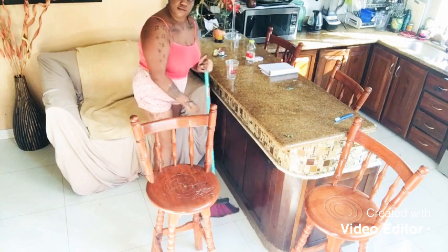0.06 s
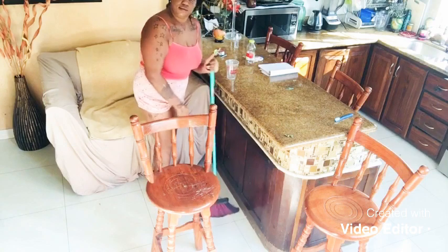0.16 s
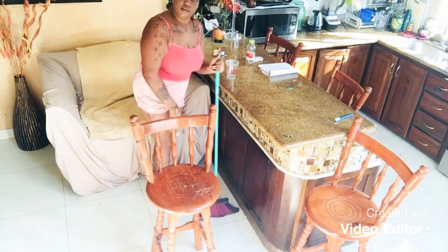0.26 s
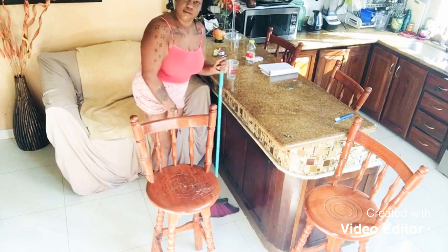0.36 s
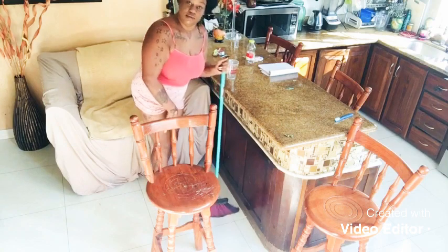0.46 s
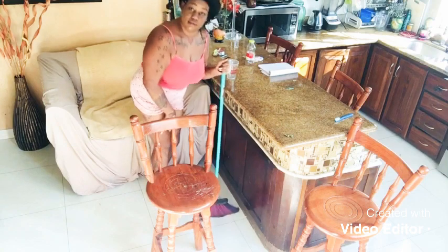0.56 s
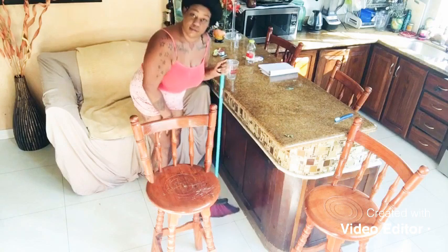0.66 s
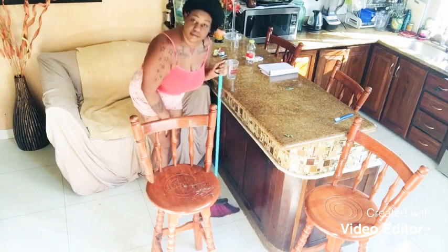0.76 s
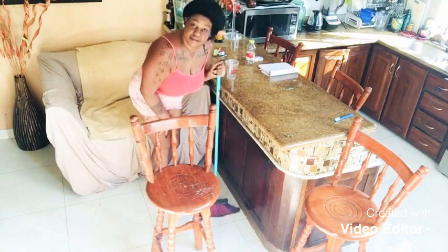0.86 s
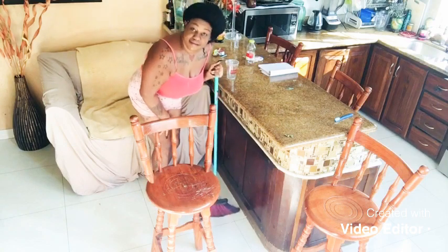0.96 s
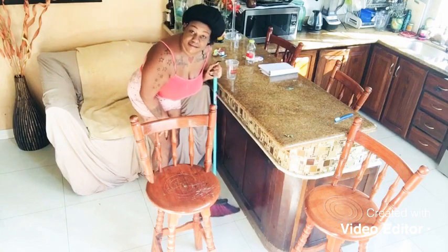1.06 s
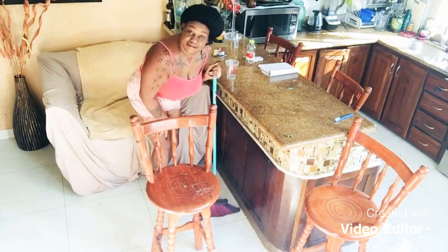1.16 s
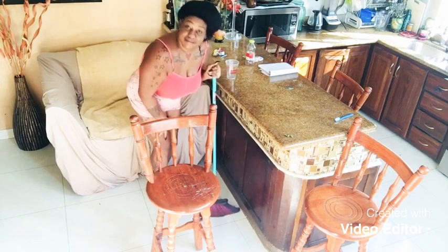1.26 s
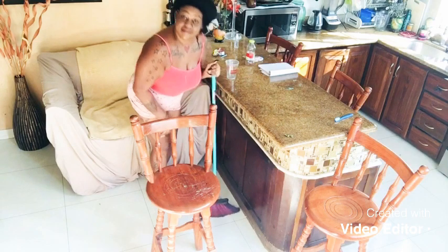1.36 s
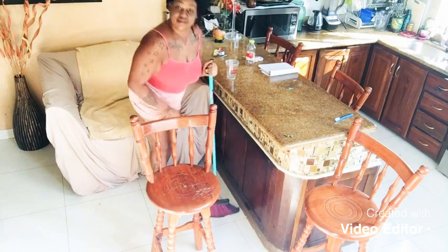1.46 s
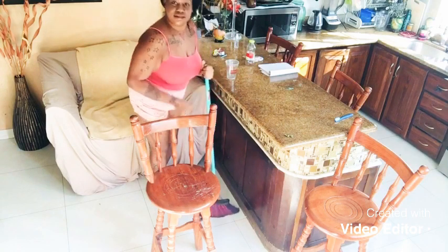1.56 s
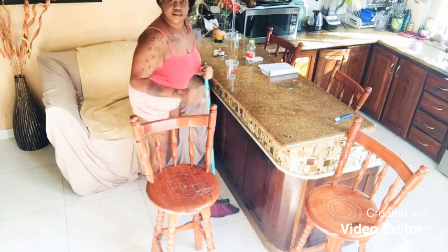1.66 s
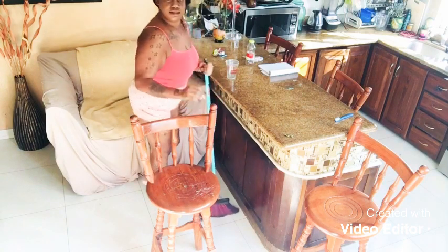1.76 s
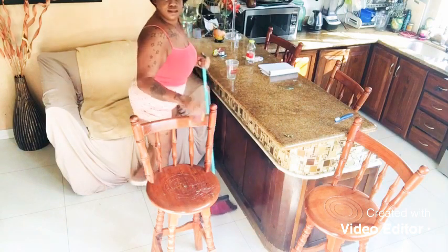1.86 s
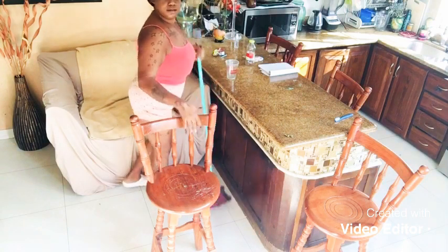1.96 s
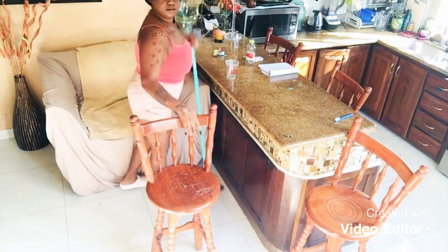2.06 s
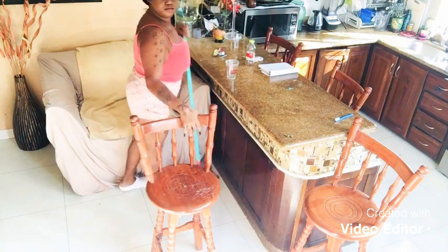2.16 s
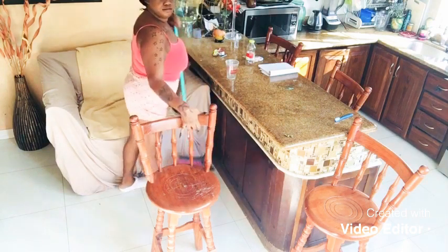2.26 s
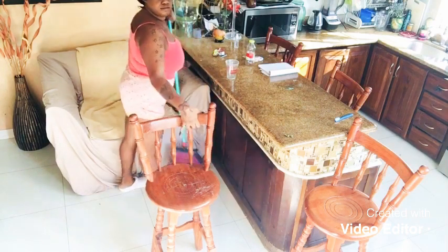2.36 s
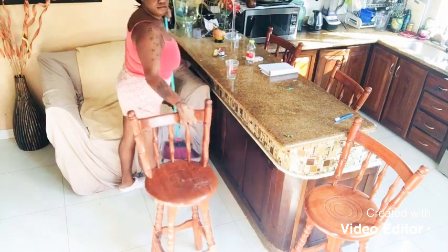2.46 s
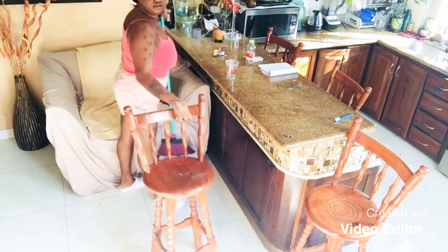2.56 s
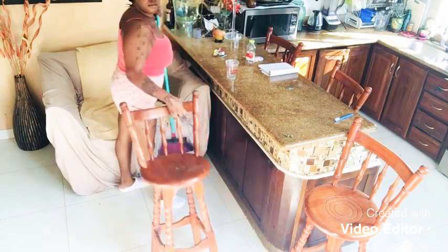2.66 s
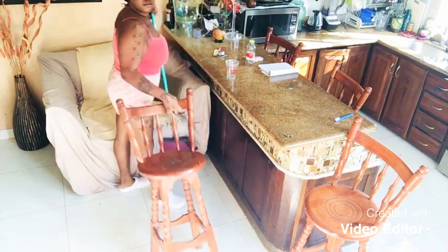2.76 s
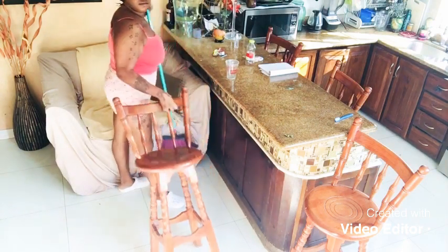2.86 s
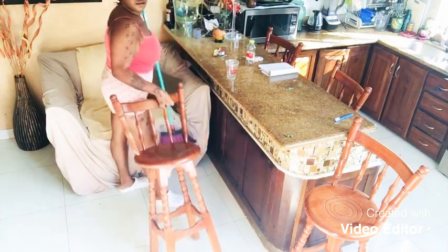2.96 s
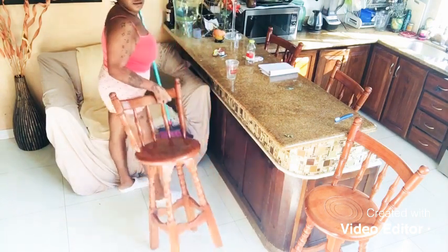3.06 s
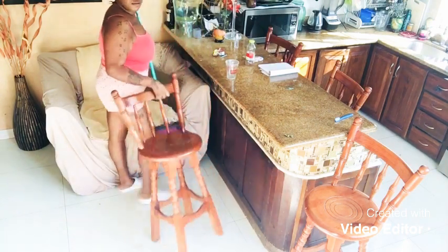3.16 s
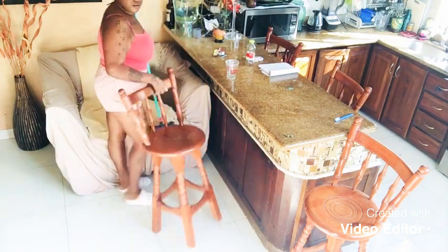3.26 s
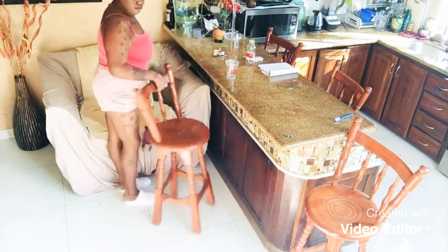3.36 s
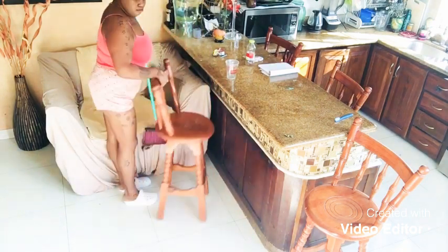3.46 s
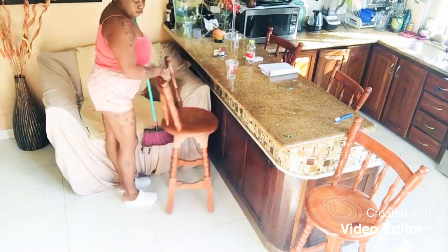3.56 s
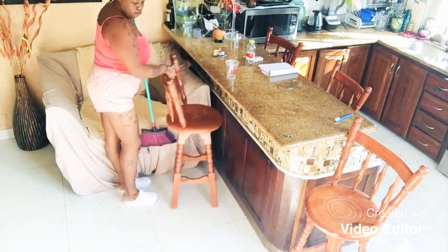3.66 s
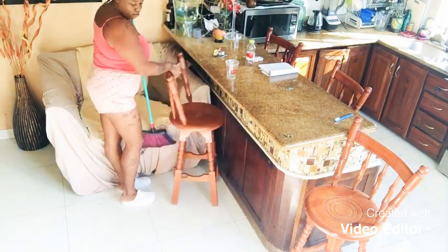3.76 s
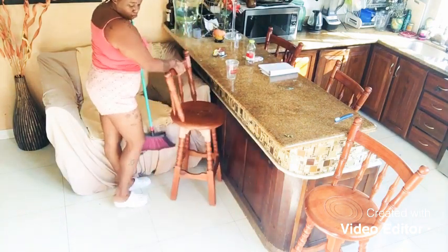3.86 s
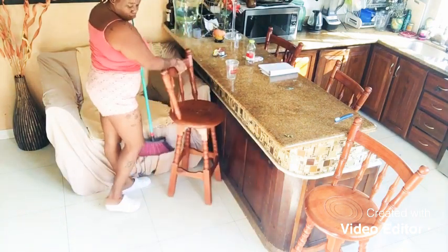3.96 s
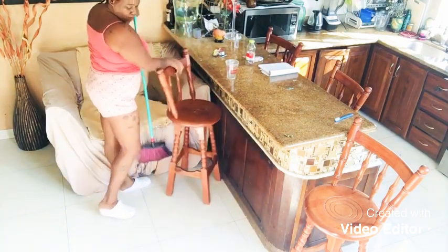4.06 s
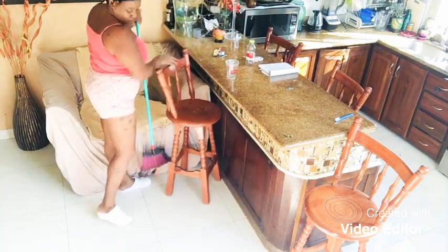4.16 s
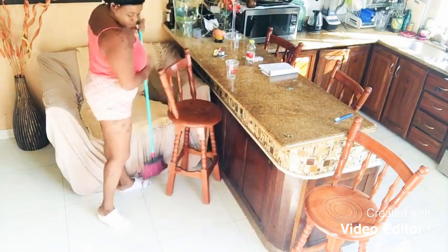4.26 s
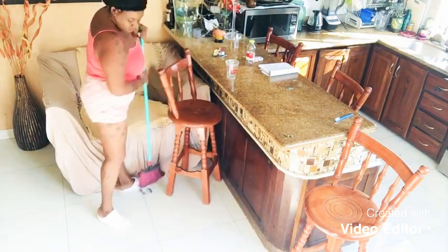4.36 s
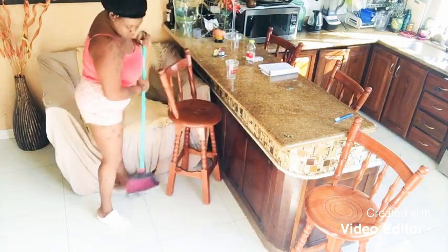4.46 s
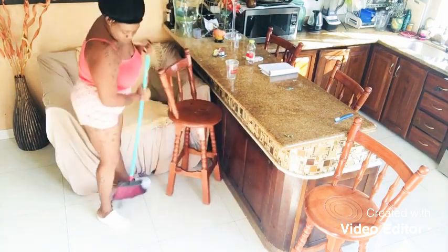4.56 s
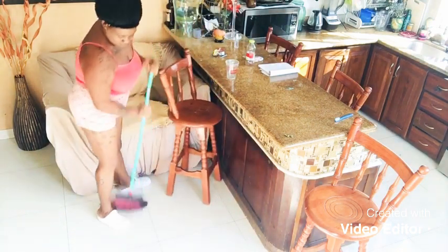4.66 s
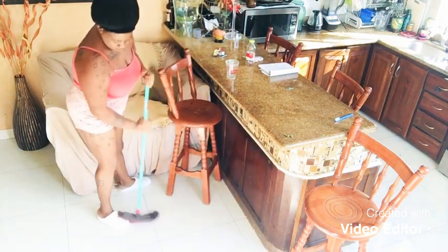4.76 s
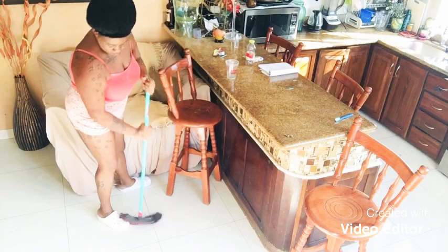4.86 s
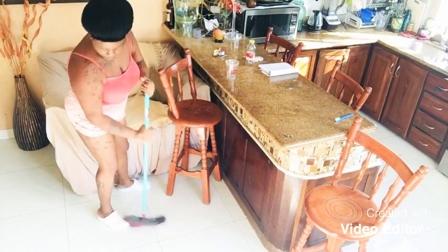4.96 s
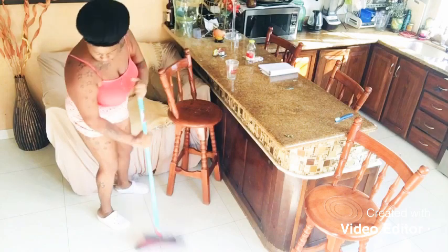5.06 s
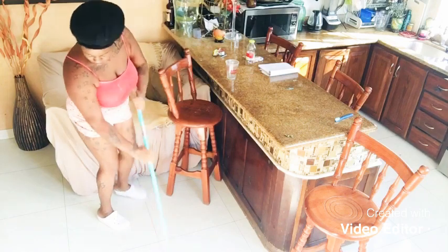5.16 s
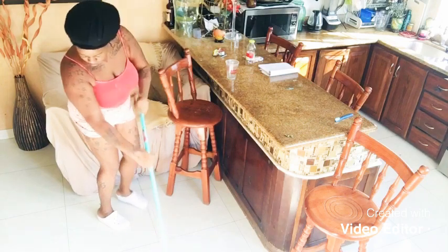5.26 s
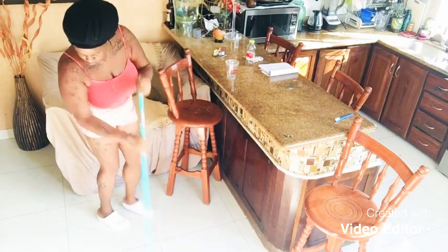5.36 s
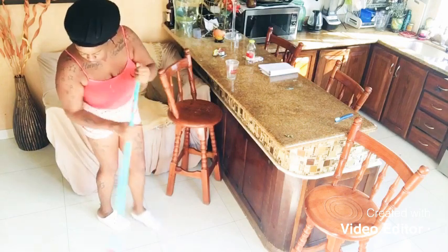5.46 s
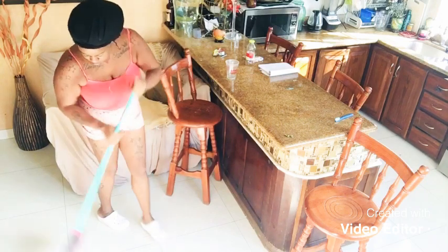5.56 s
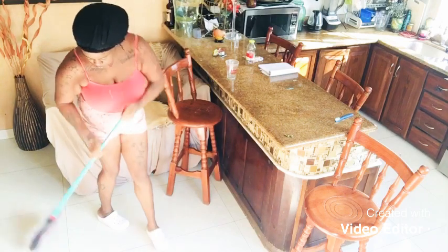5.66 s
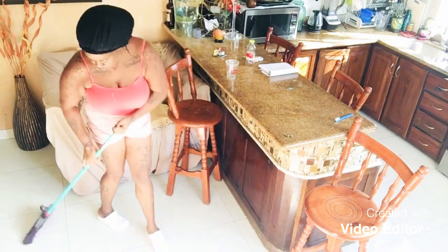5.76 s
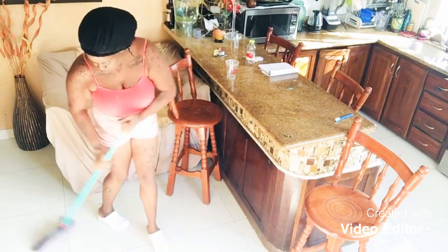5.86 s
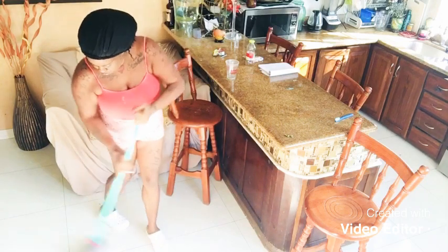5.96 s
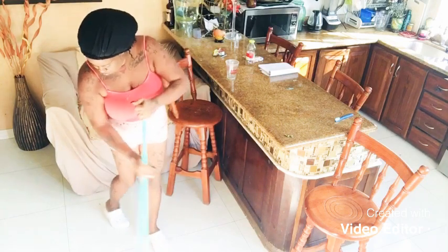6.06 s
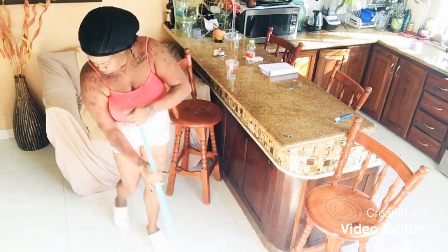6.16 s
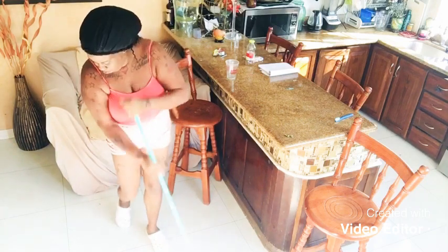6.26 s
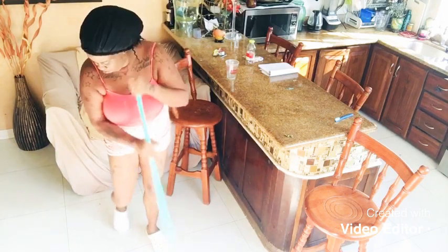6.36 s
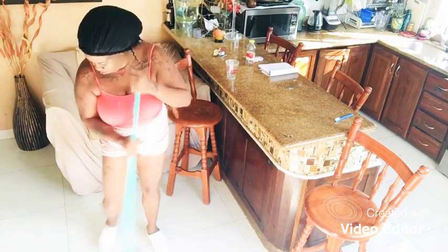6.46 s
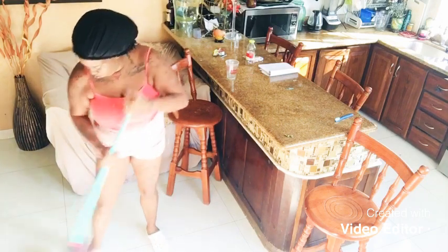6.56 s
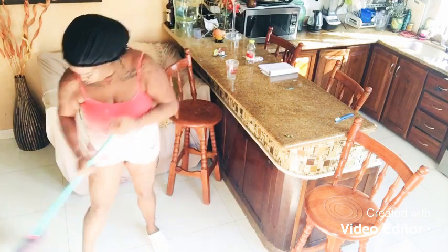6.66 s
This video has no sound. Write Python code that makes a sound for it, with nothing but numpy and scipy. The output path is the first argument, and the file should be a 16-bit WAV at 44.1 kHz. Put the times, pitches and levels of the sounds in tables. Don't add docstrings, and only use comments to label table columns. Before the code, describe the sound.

Close, hard clacks and a juddering wooden drag on glazed tile burst out of a quiet kitchen, surrounded by light bristle brushing and small taps.

```python
import sys
import numpy as np
from scipy import signal
from scipy.fft import rfft, irfft, next_fast_len
from scipy.io import wavfile
from scipy.ndimage import uniform_filter1d, map_coordinates

SR = 44100
rng = np.random.default_rng(int(sys.argv[2]) if len(sys.argv) > 2 else 0)


def ratio(d):
    e = np.asarray(d, float) / 20
    return 10 ** e


def transcribe(u):
    v = np.clip(np.atleast_2d(u).T, -1, 1)
    q = np.round(v * 32767).astype(np.int16)
    wavfile.write(sys.argv[1], SR, q)


N = 295911

# centre_hz, width_hz, level_db
STOOL_FRAME = [(72.3, 16, -3), (173, 22.9, -2), (243, 20.8, -5.5), (292, 12, -6.5), (354.8, 33, -4.5),
               (468, 40, -12), (635, 35, -9.5), (942, 60, -2), (1120, 55, 4.5), (1313, 50, -4.5),
               (1480, 59.9, -4.5), (1620, 82, 1.5), (2050, 130, -3), (2555, 120, -5), (3000, 150, -10.5),
               (3580, 100, -7.5), (4300, 200, -14.5)]
# frequency_hz, level_db (per Hz)
STRUCK_WOOD = [(180, -44.5), (300, -7), (348, -4.5), (535, 1), (1120, -9), (1370, -10), (2040, -11),
               (3630, -12.5), (4960, -28.5), (6900, -34), (15500, -53.5)]


def leg_blows():
    # start_s, peak_db, thud_db, click_db, leg_pitch_hz
    blows = [(2.976, -27, -20.5, -16.5, 1500), (2.981, -17.5, -16.5, -16, 1400),
             (2.994, -20.5, -13.5, -27.5, 1260), (3.234, -39.5, -6, -22, 600),
             (3.255, -39.5, -11, -14.5, 1065), (3.368, -0.5, -22, -34, 1450), (3.372, -3, -22, -30, 1569),
             (3.3775, 1.5, -19, -28, 1400), (3.96, -19, -5, -34, 1900), (3.965, -18, -4, -46.5, 1490),
             (3.977, -14, -8.5, -38, 980), (4.205, -26, 1, -19, 1120), (4.263, -16, -12, -26, 2000)]
    rows = [(*row, contact_s(.0055, row[1])) for row in blows]
    return knocks(rows, ring_db=-0.5, width=.42, wet_db=-1.5, gain_db=-9.5, swell=0.062, broad=0.57, low_hz=470)


def leg_slips():
    # start_s, peak_db, thud_db, click_db, leg_pitch_hz
    slips = [(3.412, -14, -19, -30.5, 1570), (3.511, -14.5, -18, -28, 1170), (3.539, -4.5, -10, -30, 2050),
             (3.556, -13, -11, -30, 1220), (3.574, -14, -19, -28, 690), (3.625, -13.5, -3, -29.5, 2090),
             (3.679, -10, -22, -26, 1130), (3.706, -8, -26, -23.5, 2030), (3.721, -7.5, -10.5, -29.5, 1620),
             (3.756, -16, -38, -27.5, 1640), (3.78, -6, -28, -25, 2050), (3.81, -17, -12.5, -28.5, 2900),
             (4.005, -21.5, -12, -23, 1650), (4.035, -27, 1.5, -33, 1100), (4.222, -20.5, -7, -22.5, 1150),
             (4.25, -19.5, -15, -28, 1000)]
    rows = [(*row, contact_s(.0055, row[1])) for row in slips]
    return knocks(rows, ring_db=3.0, width=.18, wet_db=-3.5, gain_db=-8, swell=1.8, broad=0.34, low_hz=452)


def drag():
    # start_s, length_s, scrape_db, shudder_db, deep_db
    shoves = [(2.84, .11, -66, -85, -72), (2.99, .08, -56, -60, -41), (3.1, .08, -59, -72, -47),
              (3.235, .05, -60, -72, -44), (3.385, .06, -29, -40, -40), (3.47, .04, -34, -36, -41),
              (3.52, .16, -27.5, -38, -42), (3.74, .08, -38, -38, -34.5), (3.88, .03, -55, -50, -41),
              (3.97, .05, -50, -49, -34.5), (4.14, .05, -58, -47, -47), (4.22, .07, -41, -37, -44)]
    start, length, *db = np.transpose(shoves)
    rise_db_s = np.array([[750], [500], [500]])
    fall_db_s = np.array([[260], [160], [260]])
    levels = np.transpose(db)[..., None]
    scrape_db, shudder_db, deep_db = gestures(start, length, levels, rise_db_s, fall_db_s)

    def wood(f):
        return causal((np.abs(modes(STOOL_FRAME, f)) + .25) * ratio(along(STRUCK_WOOD, f)) * (f > 300))

    slips = grains(3000, spread_db=1) * ratio(5.04 * wobble(55))
    scrape = ratio(scrape_db) * patchy(filtered(slips, wood), patchy_db=4)
    echo = signal.fftconvolve(scrape, tails(count=1)[0])[:N]

    shudder = unit(filtered(grains(360, spread_db=2.0), lambda f: modes(STOOL_FRAME[1:6], f) ** 2))
    sway = ratio(1.8 * wobble(15)) * tone(STOOL_FRAME[1][0], wander=.04, rate=11)
    shudder = 0.85 * shudder + 0.95 * sway

    deep = ratio(2.5 * wobble(14)) * tone(STOOL_FRAME[0][0], wander=0.049, rate=9)
    floor = unit(filtered(slips, lambda f: modes([(75, 90, 0)], f) ** 2))
    deep = deep + .6 * floor
    return scrape + 0.45 * echo + ratio(shudder_db) * shudder + ratio(deep_db) * deep


def ringing_rungs():
    # start_s, pitch_hz, level_db, t60_s
    rungs = [(3.0, 292, -49, 1.1), (3.24, 600, -50, .6), (3.62, 356, -37, .6), (3.79, 356, -33, .45),
             (4.02, 250, -43, .8), (4.24, 173, -30, .45)]
    out, t = np.zeros(N + SR), np.arange(SR // 2) / SR
    flutter_db, drift = 1.6 * wobble(25), 1 + .012 * wobble(20)
    for s, hz, db, t60 in rungs:
        now = slice(round(s * SR), round(s * SR) + len(t))
        decay_db = db + 3 - 60 * t / t60 + flutter_db[now]
        swell = (1 - np.exp(-t / .015)) * ratio(decay_db) * np.cos(np.pi * t)
        out[now] += swell * np.sin(2 * np.pi * hz * np.cumsum(drift[now]) / SR)
    return out[:N]


def small_taps():
    # start_s, peak_db, click_db, pitch_hz
    taps = [(.426, -51.5, -19, 1560), (1.287, -56.5, -16, 4000), (1.5, -69.5, 3, 3000),
            (1.951, -34, -22.5, 1870), (1.952, -36, -23, 1350), (2.16, -47, -18, 1960),
            (2.207, -45.5, -20, 2400), (2.28, -40.5, -17.5, 2050), (2.281, -50.5, -10, 4000),
            (2.725, -50.5, -16, 1980), (4.14, -61, 1, 3000), (4.618, -53, -7, 2970), (5.35, -77, -9, 4400),
            (5.566, -58.5, -5, 3276), (5.599, -44.5, -13.5, 1780), (5.6, -46.5, -10, 2320),
            (5.638, -43.5, -22, 1307), (5.64, -52, -24, 2250), (6.573, -73, -18, 4400)]
    # start_s, peak_db, pitch_hz
    nudges = [(.775, -59, 3170), (1.99, -51.5, 1940), (2.335, -44.5, 1800), (2.85, -50, 1770),
              (2.927, -54, 1340), (6.632, -45.5, 1250)]
    thud_db = -30
    rows = [(s, db, thud_db, click_db, hz, contact_s(.004, db + 35)) for s, db, click_db, hz in taps]
    rows += [(s, db, thud_db, -26, hz, .021) for s, db, hz in nudges]
    return knocks(sorted(rows), ring_db=-14, width=0.17, wet_db=-2.5, gain_db=-11, swell=.12, broad=.04,
                  low_hz=1068)


def squeak():
    # time_s, pitch_hz, level_db
    glide = [(2.27, 2105, -90), (2.29, 2040, -58), (2.34, 1960, -61), (2.4, 1920, -65), (2.44, 1920, -63),
             (2.48, 1880, -89.5)]
    hz, db = curves(glide)
    return ratio(db + 5 * wobble(60)) * tone(hz, wander=.03, rate=200)


def broom():
    # start_s, length_s, pressure_db, brightness_db
    strokes = [(.52, .02, -78, 1.1), (1.29, .17, -75, -3), (1.505, .11, -69, 1.5), (2.12, .08, -75, -4),
               (2.225, .01, -63, -1.5), (2.29, .2, -68.5, -7), (2.73, .1, -72, -5), (2.84, .32, -65, -.6),
               (3.19, .04, -62, 4), (3.25, .08, -54.5, 1.5), (4.14, .02, -56, -1.5), (4.33, .04, -59, 1.5),
               (4.63, .04, -62, 1.1), (4.69, .06, -59, -.6), (4.855, .01, -66, -3), (4.9, .07, -60.5, -.6),
               (5.03, .13, -67, 4), (5.58, .06, -68, 1.5), (5.8, .06, -77, 3), (5.875, .14, -66, 2.5),
               (6.05, .055, -63.5, 2.5), (6.22, .16, -75, 1.5), (6.43, .04, -74, 6), (6.59, .09, -60, 1.5)]
    # frequency_hz, level_db (per Hz)
    hiss = [(2650, -28), (4500, -1.5), (4960, -2), (6110, 1.5), (10400, -6), (11300, -4), (15500, -18.5)]
    rasp = [(1300, -22.5), (2000, -0.5), (3000, -1), (4400, -1), (5500, -25.5)]
    body = [(400, -25), (900, -5.5), (1300, -0.5), (1900, -7.5), (2800, -28)]
    start, length, db, bright_db = np.transpose(strokes)
    levels = np.transpose([db - 4 + bright_db, db, db - 4 - bright_db])[..., None]
    sweep = gestures(start, length, levels, rise=450, fall=120)
    flutter_db = 1.2 * wobble(25)
    out = np.zeros(N)
    for level_db, colour in zip(sweep, (hiss, rasp, body)):
        layer = filtered(grains(4000, spread_db=0), lambda f: ratio(along(colour, f)))
        out += ratio(level_db + flutter_db + wobble(11)) * patchy(layer, patchy_db=1.8)
    return out


def flicks():
    # start_s, peak_db, pitch_hz
    snaps = [(1.5, -47, 9500), (2.156, -63, 10500), (2.217, -55, 11500), (5.35, -60, 12000),
             (5.599, -54, 10500)]
    out, t = np.zeros(N + SR), np.arange(SR // 2) / SR
    for s, db, hz in snaps:
        burst = rng.standard_normal(len(t)) * (np.exp(-t / .004) + .12 * np.exp(-t / .04))
        snap = filtered(burst, lambda f: modes([(hz, .6 * hz, 0)], f) ** 2)
        out[round(s * SR):][:len(t)] += ratio(db) * snap
    return out[:N]


def house_hum():
    # centre_hz, width_hz, level_db
    resonances = [(35, 26, -8), (61.5, 14, -1.5), (77, 7.1, 1.5), (161.7, 31, -14.5), (212.9, 10, -8),
                  (249, 5.9, -15.5), (382, 22, -25)]
    # centre_hz, width_hz
    drone_band = (98, 7.6)
    # time_s, level_db
    drone_levels = [(0, -60), (.56, -58), (.68, -65), (1.0, -57), (1.6, -63), (1.72, -78), (1.9, -63),
                    (2.25, -57), (2.42, -60), (3.05, -51), (3.2, -66), (4.76, -78), (4.84, -63),
                    (5.12, -57), (5.8, -60), (6.06, -78), (6.2, -60), (6.71, -63)]
    drone_db, = curves(drone_levels)
    hum_db = -62.5 + .08 * (drone_db - drone_db.mean())
    hum = unit(filtered(rng.standard_normal(N), lambda f: modes(resonances, f) / (1 + (f / 500) ** 2)))
    blur = unit(filtered(rng.standard_normal(N), lambda f: modes([(*drone_band, 0)], f) ** 2))
    drone = .4 * blur + 1.5 * tone(drone_band[0], wander=.015, rate=2)
    return ratio(hum_db + 6.5) * hum + ratio(drone_db - 1.5) * drone


def appliance_whine():
    # centre_hz, width_hz, level_db
    lines = [(2540, 14, -85.5), (3548, 12, -87.5), (4150, 12, -92.5), (4479, 50, -87), (4450, 15, -92),
             (7973, 20, -87.5), (8100, 20, -89.5), (8020, 20, -86.5)]

    def fuzz(f):
        return sum(np.sqrt(2 * SR / np.pi / w) * modes([(hz, w, db / 2)], f) ** 2 for hz, w, db in lines)

    tones = sum(.6 * ratio(db) * tone(hz, wander=0.0007, rate=15) for hz, w, db in lines)
    return .45 * filtered(rng.standard_normal(N), fuzz) + tones


def still_air():
    # frequency_hz, level_db (per Hz)
    colour = [(150, -34.5), (250, -3.5), (400, -9.5), (850, -14.5), (1300, -18.5), (2000, -21.5),
              (4600, -24.5), (5000, -26.5), (8200, -30), (12000, -33.5), (15000, -41.5), (15700, -50.5)]
    air = unit(filtered(rng.standard_normal(N), lambda f: ratio(along(colour, f))))
    return ratio(-68 + 0.95 * wobble(3.3)) * air


def contact_s(shortest, db):
    return shortest - .00015 * db


def knocks(table, ring_db, width, wet_db, gain_db, swell, broad, low_hz):
    out, size = np.zeros(N + SR), SR * 3 // 5
    t, f = np.arange(size) / SR, np.fft.rfftfreq(2 * size, 1 / SR)
    frame, wood = np.abs(modes(STOOL_FRAME, f)), ratio(along(STRUCK_WOOD, f))
    upper = wood * f ** 4 / (low_hz ** 4 + f ** 4)
    bright = wood / (1 + (4600 / (f + 1)) ** 6)
    low = (frame + .08) / (1 + (f / 420) ** 4) * f ** 2 / (55 ** 2 + f ** 2)
    for (s, db, thud_db, click_db, hz, contact), tail in zip(table, tails(count=len(table))):
        rattle = rng.standard_normal(size) * np.exp(-t / contact) * (t / contact) ** swell
        pitch = np.abs(modes([(hz, width * hz, 6)], f))
        body = (ratio(ring_db) * frame + pitch ** 1.5 + broad) * upper
        thud = ratio(thud_db + 13.5) * low
        click = ratio(click_db + 29) * bright
        energy = np.mean(body ** 2) / (contact * SR)
        direct = evened(rattle, 2 * size) * causal(body + thud + click) / np.sqrt(energy)
        room = 1 + ratio(wet_db) * evened(tail, 2 * size)
        out[round(s * SR):][:size] += ratio(db + gain_db) * irfft(direct * room)[:size]
    return out[:N]


def tails(count):
    # frequency_hz, t60_s
    decay = [(70, 1), (250, 0.66), (1000, .47), (3000, .45), (8000, .45), (15000, .25)]
    size = SR * 3 // 5
    hz, t, z = signal.stft(rng.standard_normal((count, size)), SR, nperseg=512)
    fading = z * ratio(-60 * t / along(decay, hz)[:, None])
    tail = signal.istft(fading, SR, nperseg=512)[1][:, :size]
    tail = tail * (1 - np.exp(-np.arange(tail.shape[1]) / SR / 0.0049))
    return tail / np.linalg.norm(tail, axis=1, keepdims=True)


def grains(rate, spread_db):
    size = np.minimum(rng.exponential(size=N), 4)
    return unit((rng.random(N) < rate / SR) * rng.standard_normal(N) * ratio(spread_db * size))


def gestures(start, length, db, rise, fall):
    step = 64
    t = np.arange(N // step + 1) * step / SR
    power = 0
    for s, n, d in zip(start, length, db):
        level_db = d - rise * np.maximum(s - t, 0) - fall * np.maximum(t - s - n, 0)
        power = power + ratio(2 * level_db)
    return [np.interp(np.arange(N) / SR, t, 10 * np.log10(p + 1e-12)) for p in power]


def patchy(x, patchy_db):
    z = signal.stft(x, nperseg=512)[2]
    field = uniform_filter1d(rng.standard_normal(z.shape), size=5, axis=0)
    field = uniform_filter1d(field, size=6, axis=1)
    return unit(signal.istft(z * ratio(patchy_db * field / np.std(field)), nperseg=512)[1][:N])


def tone(hz, wander, rate):
    return np.sqrt(2) * np.sin(2 * np.pi * np.cumsum(hz * (1 + wander * wobble(rate))) / SR)


def wobble(rate):
    steps = np.arange(0, N + 16, 16)
    knots = rng.standard_normal(int(N * rate / SR) + 4)
    return np.interp(np.arange(N), steps, map_coordinates(knots, [steps * rate / SR]))


def modes(table, f):
    return sum((-1) ** k * ratio(db) * 1j * f * w / (c * c - f * f + 1j * f * w)
               for k, (c, w, db) in enumerate(table))


def causal(gain):
    c = irfft(np.log(gain + 1e-6))
    c[1:len(c) // 2] *= 2
    c[len(c) // 2 + 1:] = 0
    return np.exp(rfft(c))


def evened(x, size):
    z = rfft(x, size)
    return z / np.sqrt(np.abs(uniform_filter1d(np.abs(z) ** 2, size=size // 250)) + 1e-12)


def filtered(x, response):
    m = next_fast_len(x.shape[-1] + SR // 4)
    return irfft(rfft(x, m) * response(np.fft.rfftfreq(m, 1 / SR)), m)[..., :x.shape[-1]]


def along(points, hz):
    f, v = np.transpose(points)
    return np.interp(np.log(hz + 1), np.log(f + 1), v)


def curves(rows):
    s, *cols = np.transpose(rows)
    return [np.interp(np.arange(N) / SR, s, c) for c in cols]


def unit(x):
    return x / np.sqrt(np.mean(x ** 2, -1, keepdims=True) + 1e-20)


def scene():
    stool = leg_blows() + leg_slips() + drag() + ringing_rungs()
    sweeping = small_taps() + squeak() + broom() + flicks()
    house = house_hum() + appliance_whine() + still_air()
    return (stool + sweeping + house)[None]


def band_limit(x):
    return signal.sosfilt(signal.butter(12, 15720, fs=SR, output="sos"), x)


def record(dry):
    soft = dry / (1 + np.abs(dry) ** 6) ** (1 / 6)

    def mic(f):
        return (1j * f / (36 + 1j * f)) ** 3 * (f < 15720) / (1 + (f / 15300) ** 14)

    return band_limit(filtered(soft, mic))


dry = scene()
out = record(dry)
transcribe(out)
```